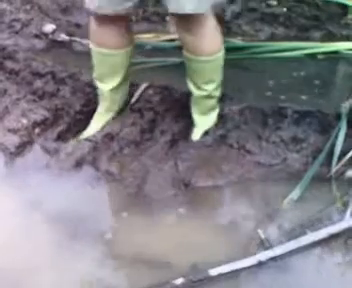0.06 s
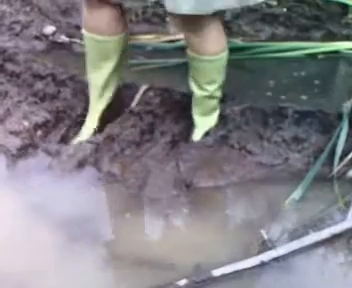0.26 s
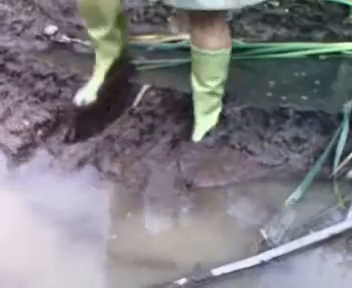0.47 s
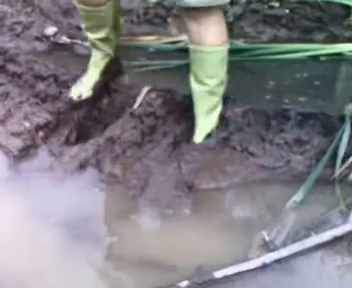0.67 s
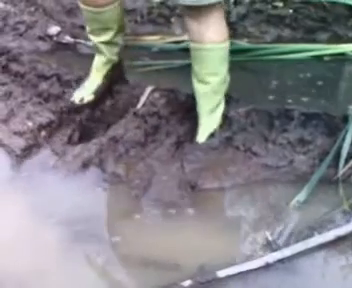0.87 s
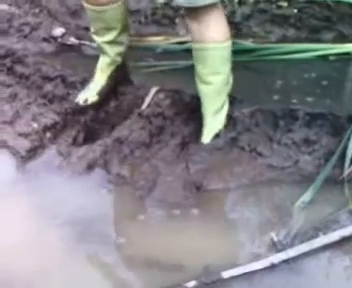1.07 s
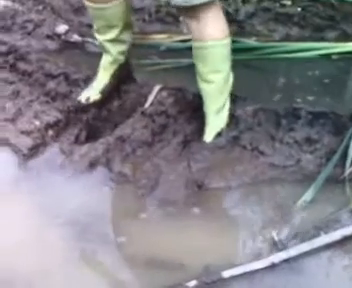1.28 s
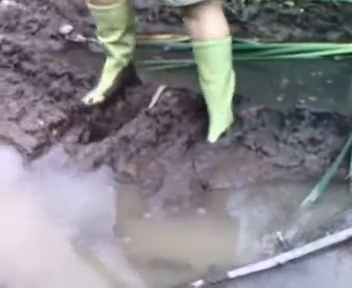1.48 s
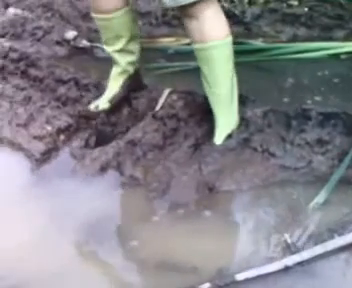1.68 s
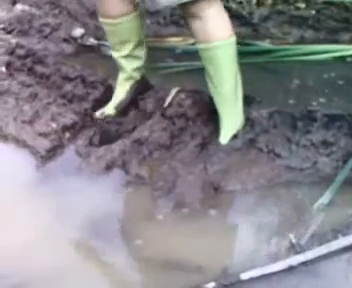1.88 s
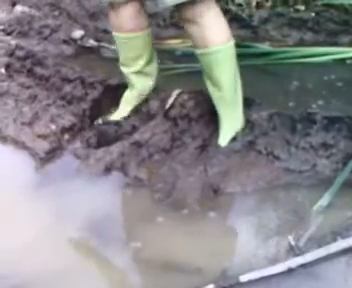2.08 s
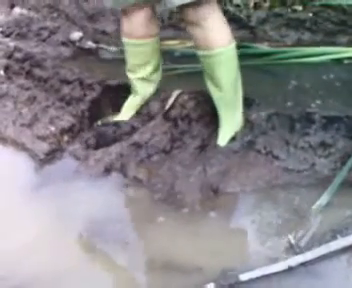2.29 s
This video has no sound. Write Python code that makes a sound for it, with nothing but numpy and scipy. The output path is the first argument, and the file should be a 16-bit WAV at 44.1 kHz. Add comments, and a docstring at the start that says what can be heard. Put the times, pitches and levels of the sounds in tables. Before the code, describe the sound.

A rubber boot squelches out of wet mud, then steps down with a soft squish.

```python
"""A distant engine hums over outdoor rumble and steady hiss; mud crackles faintly under shifting weight.
Almost at once a rubber boot is pulled out of the wet mud: the seal snaps, air pockets pop,
and mud films tear in a dense, frothy crackle that rings the footprint.
At about two seconds the boot is set down with a soft squish, a few small bubbles and settling ticks."""
import sys
import numpy as np
from scipy import signal
from scipy.fft import rfft, irfft, next_fast_len
from scipy.io import wavfile
from scipy.ndimage import uniform_filter1d

SR = 44100
rng = np.random.default_rng(int(sys.argv[2]) if len(sys.argv) > 2 else 0)


def digitize_waveform(pressure):
    """Quantize a signal to 16-bit integers and store it at the path in sys.argv[1].

    Rows of a 2-D input are taken as channels; values are limited to [-1, 1].
    """
    field = np.atleast_2d(pressure).T
    bounded = np.clip(field, -1, 1)
    quanta = np.round(bounded * 32767).astype(np.int16)
    wavfile.write(sys.argv[1], SR, quanta)


N = 108045
T = np.arange(N) / SR


def undb(db):
    """Decibels to gain."""
    return 10 ** (np.asarray(db) / 20)


def unit(x):
    """Scale to rms 1."""
    return x / np.sqrt(np.mean(x ** 2))


def steady(x):
    """Hold the short-term rms at 1 and keep the grain."""
    return x / np.sqrt(np.abs(uniform_filter1d(x ** 2, 500)) + 1e-12)


def fader(points, outside_db=None):
    """Gain riding through (time [s], level [dB]) points."""
    return undb(np.interp(T, *np.array(points).T, left=outside_db, right=outside_db))


def walk(rate_hz):
    """Smooth random wander with a spread near 1."""
    hold = int(SR / rate_hz)
    steps = np.repeat(rng.standard_normal(N // hold + 1), hold)
    return 1.24 * uniform_filter1d(uniform_filter1d(steps, hold), hold)[:N]


def colour(x, points):
    """Causal EQ through (frequency [Hz], gain [dB]) points."""
    hz, db = np.array(points, float).T
    size = next_fast_len(2 * N)
    freqs = np.maximum(np.fft.rfftfreq(size, 1 / SR), 1)
    gain = undb(np.interp(np.log(freqs), np.log(hz), db))
    cepstrum = irfft(np.log(gain), size)
    cepstrum[1:size // 2] *= 2  # minimum phase: no ringing ahead of a click
    cepstrum[size // 2 + 1:] = 0
    return irfft(rfft(x, size) * np.exp(rfft(cepstrum)), size)[:N]


def band(x, hz, kind, order=2):
    """Butterworth filter."""
    return signal.sosfilt(signal.butter(order, hz, kind, fs=SR, output="sos"), x + 1e-18)


def add(out, start_s, sound):
    """Mix a sound in at a time."""
    i = int(start_s * SR)
    out[i:i + len(sound)] += sound[:N - i]


def clicks(per_s, spread_db):
    """Random clicks, many small and a few large."""
    hit = rng.random(N) < per_s / SR
    size = np.minimum(rng.exponential(size=N), 4)
    return hit * rng.choice([-1, 1], N) * undb(spread_db * size)


def engine():
    """A distant engine: four low partials waver in pitch and level, and the lowest throbs."""
    # engine partials (frequency [Hz], base level [dB], pitch waver [fraction])
    partials = [(64.4, -51.5, 0.048), (134, -56.5, .012), (275.8, -59, 0.00848), (396.6, -65, 0.00523)]
    # throb of the lowest partial (time [s], gain [dB])
    throb = [(0, -7), (.45, 3), (.95, 0.5), (1.2, 6), (1.4, 1.5), (1.7, 1), (1.9, -11), (2.45, -11)]
    tones = []
    for hz, db, waver in partials:
        level = undb(db + 1.9 * walk(5.67))
        pitch = hz * (1 + waver * walk(8.85))
        tones.append(level * np.sqrt(2) * np.sin(2 * np.pi * np.cumsum(pitch) / SR))
    return tones[0] * fader(throb) + sum(tones[1:])


def outdoor_air():
    """A bed of smooth hiss over a rumble that swells and sinks."""
    # tone of the rumble and hiss (frequency [Hz], relative level [dB])
    spectrum = [(12, -14.5), (26, -0.5), (42, -5.5), (75, -4.5), (115, -9.5), (170, -9.5), (285, -10),
                (370, -18.5), (480, -21), (800, -27), (1400, -31), (3200, -35), (5500, -32), (7200, -33)]
    level_db, swell_db = -43.5, 2
    air = unit(colour(rng.standard_normal(N), spectrum)) * undb(level_db)
    rumble = band(air, 400, "lowpass", order=1)
    return air + rumble * (undb(swell_db * walk(6.95)) - 1)


def hollow(x):
    """Clicks heard directly and through the resonances of the footprint."""
    # resonances of the wet hollow round the boot (frequency [Hz], width [Hz], gain [dB])
    modes = [(582, 48, -1.5), (821, 33, -8), (984, 150, -4), (1346, 55, -3), (1730, 88, -8), (1860, 90, -5),
             (2124, 94, 0.5), (2250, 50, -6), (2610, 46, -2), (3350, 110, -11), (3760, 130, -12),
             (4130, 150, -6.5), (4550, 79, -3.5), (5620, 130, -9)]
    direct_db = -13
    ring = sum(undb(db) * signal.lfilter(*signal.iirpeak(hz, hz / width, fs=SR), x + 1e-18)
               for hz, width, db in modes)
    return undb(direct_db) * x + ring


def creep():
    """Mud crackles faintly as the weight shifts."""
    # crackle under the sole (time [s], level [dB])
    levels = [(0, -63.5), (.5, -64), (.9, -61), (1.2, -75), (1.6, -66), (1.75, -61), (1.85, -63),
              (2.0, -56.5), (2.15, -58), (2.3, -64.5), (2.45, -60)]
    crackle = hollow(clicks(per_s=700, spread_db=2))
    return unit(band(crackle, 6000, "lowpass")) * fader(levels)


def snaps():
    """Single films break with a wet, smeared tick that rings the hollow."""
    # snaps of the seal and of the settling mud (time [s], peak [dB], low-pass cutoff [Hz])
    breaks = [(.1453, -31, 2500), (.1508, -23, 6070), (.2068, -37, 2800), (.2358, -21.5, 5050),
              (.2457, -14, 4600), (0.2477, -17, 3000), (.2648, -12.5, 4880), (.321, -15.5, 6000),
              (.329, -15.5, 3900), (.3615, -26.5, 4000), (2.2845, -40, 2300), (2.3235, -42, 3020),
              (2.361, -37.5, 3330), (2.4215, -38.5, 3200)]
    smear_s, smear_db = 0.00057, -15.5
    out = np.zeros(N)
    t = T[:4096]
    for start, db, cutoff in breaks:
        smear = undb(smear_db) * rng.standard_normal(len(t)) * np.exp(-t / smear_s)
        tick = hollow((t == 0) + smear)
        snap = band(band(tick, 890, "highpass"), cutoff, "lowpass", order=6)
        add(out, start, undb(db) * snap / np.abs(snap).max())
    return out


def bubble(hz, decay_s, glide, attack_s):
    """One bubble: a quickly fading ring that glides in octaves per second, up to a limit."""
    t = T[:int(6 * decay_s * SR) + 2]
    envelope = (1 - np.exp(-t / attack_s)) ** 2 * np.exp(-t / decay_s)
    pitch = hz * 2 ** np.clip(glide * t, -1, .8)
    return envelope / envelope.max() * np.sin(2 * np.pi * np.cumsum(pitch) / SR)


def pops():
    """Each air pocket rings briefly and unevenly, gliding in pitch as it opens."""
    # air pockets (time [s], pitch [Hz], level [dB], decay [s], glide [octaves/s])
    pockets = [(.1456, 2155, -31, .0026, 16), (0.147, 1390, -38.5, 0.0038, 5),
               (.154, 2400, -40.5, 0.0086, 7), (0.2072, 1963, -38, .0025, 6),
               (0.2441, 1332, -24, 0.0041, 10), (.2895, 2120, -16.5, 0.0034, 9.5),
               (.3, 2030, -16, 0.0026, 16), (0.305, 168.6, -35, .012, -2), (.3268, 579.5, -24, 0.0094, -8),
               (.361, 965, -43, 0.0082, -3), (0.447, 1580, -47.5, 0.011, 50.5),
               (2.028, 1606, -47.5, 0.0094, 50), (2.114, 777, -43.5, 0.0064, 6),
               (2.166, 1406, -43, 0.0063, 6), (2.212, 1654, -50.5, .022, 3.5),
               (2.3225, 2280, -46, 0.0023, 41)]
    roughness = 0.24
    out = np.zeros(N)
    for start, hz, db, decay, glide in pockets:
        add(out, start, undb(db) * bubble(hz, decay, glide, attack_s=0.00064))
    return out * (1 + roughness * walk(900))


def froth(start, end):
    """A swarm of tiny bubbles bursts in the mud; the higher ones are shorter and stronger."""
    per_s, low_hz, high_hz = 1500, 494, 6980
    decay_cycles, octaves_per_decay = 3.25, 0.072
    out = np.zeros(N)
    for when, height, strength in rng.random((int(per_s * (end - start)), 3)):
        hz = low_hz * (high_hz / low_hz) ** height
        decay = decay_cycles / hz
        ring = bubble(hz, decay, octaves_per_decay / decay, attack_s=.5 / hz)
        add(out, start + when * (end - start), strength * ring * hz / high_hz)
    return out


def tearing():
    """Mud films tear and froth as the boot lifts; the sound widens and deepens as the hollow opens."""
    # level of the tearing mud by register
    # (time [s], lows [dB], low mids [dB], mids [dB], high mids [dB], treble [dB], top [dB])
    contour = [(.234, -69, -76, -80, -60, -41, -68), (.24, -62, -57, -50, -43, -40, -50),
               (0.248, -61, -43, -38.5, -46, -31, -37), (.257, -47, -64, -40, -27.5, -37.5, -37),
               (.265, -41, -37.5, -37.5, -30.5, -34, -37.5), (0.289, -46.5, -40, -31, -23, -31.5, -29.5),
               (.308, -39.5, -37.5, -31, -30, -33, -32), (0.331, -38, -29.5, -39.5, -31, -37.5, -32.5),
               (.343, -44.5, -45, -43, -43, -50, -43), (.368, -60, -63, -65, -49, -49.5, -46),
               (.39, -62, -70, -63, -59, -62, -56), (.44, -71, -68, -61, -71, -72, -66)]
    # the six registers of the tear (low edge [Hz], high edge [Hz])
    registers = [(120, 400), (400, 800), (800, 1600), (1600, 2800), (2800, 5000), (5000, 9000)]
    # tone of a tearing film (frequency [Hz], gain [dB])
    film_eq = [(150, 4), (400, -1.5), (1000, -6), (1550, -2), (1800, -2), (2500, 0), (3400, 6.5), (4500, 1),
               (5000, -1), (6100, 0), (6500, -4), (7300, 1.5), (8500, 7)]
    froth_db = -6
    times, *levels = np.array(contour).T
    rips = steady(clicks(per_s=4800, spread_db=2.5))
    bubbles = undb(froth_db) * steady(froth(times[0], times[-1]))
    crackle = colour(hollow(rips + bubbles), film_eq)
    out = np.zeros(N)
    for edges, db in zip(registers, levels):
        layer = steady(band(crackle, edges, "bandpass", order=4))
        out += layer * fader(np.column_stack([times, db]), outside_db=-120)
    return out


def squish():
    """The sole presses back into the mud and squeezes out a soft, dull crackle."""
    # tone of squeezed mud (frequency [Hz], gain [dB])
    squish_eq = [(300, -12), (600, -4), (900, 2), (1500, 0.5), (2100, -3.5), (2700, -7), (3300, -19),
                 (7500, -12)]
    # squish under the sole (time [s], level [dB])
    levels = [(2.08, -69), (2.13, -55), (2.162, -53.5), (2.174, -43), (2.2, -51), (2.222, -53), (2.25, -59),
              (2.3, -60)]
    crackle = hollow(clicks(per_s=1500, spread_db=2.5))
    return steady(colour(crackle, squish_eq)) * fader(levels, outside_db=-120)


def bank_scatter(x):
    """The bank throws back a short, diffuse reflection."""
    gain_db, decay_s, predelay_s = -14.5, 0.029, 0.003
    t = T[:SR // 4]
    tail = rng.standard_normal(len(t)) * np.exp(-t / decay_s) * (t > predelay_s)
    return undb(gain_db) * signal.fftconvolve(x, tail / np.linalg.norm(tail))[:N]


def scene():
    """Engine and outdoor air behind the mud and its scatter from the bank, in mono."""
    background = engine() + outdoor_air()
    mud = creep() + snaps() + pops() + tearing() + squish()
    return (background + mud + bank_scatter(mud))[None]


def record(dry):
    """The microphone dulls the highest treble and a steep low-pass cuts the top."""
    # treble response of the microphone (frequency [Hz], gain [dB])
    mic_eq = [(7400, -0.5), (7700, -17), (7900, -36), (8600, -20), (8900, -33.5)]
    top_hz = 8900
    high_cut = signal.ellip(10, .2, 70, top_hz, fs=SR, output="sos")
    return signal.sosfilt(high_cut, colour(dry[0], mic_eq))[None]


dry = scene()
out = record(dry)
digitize_waveform(out)
```